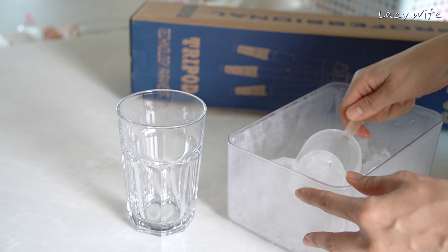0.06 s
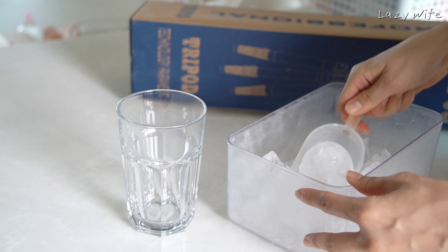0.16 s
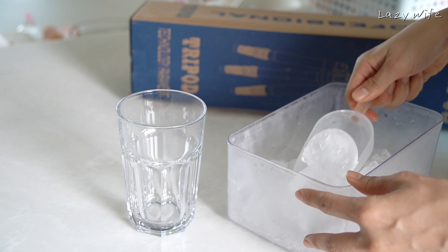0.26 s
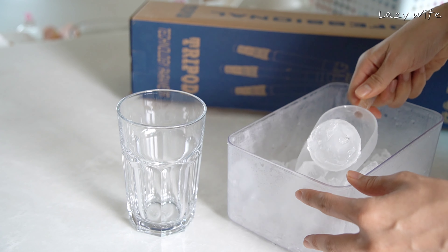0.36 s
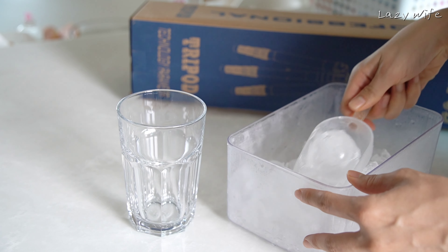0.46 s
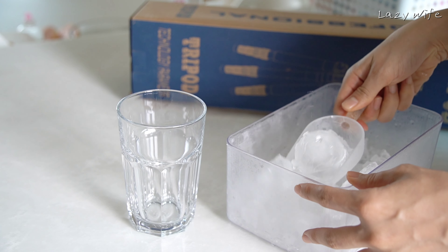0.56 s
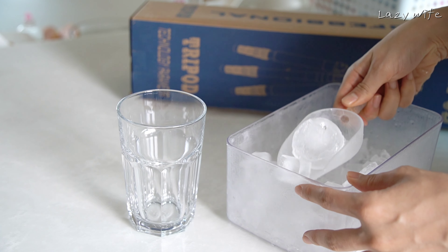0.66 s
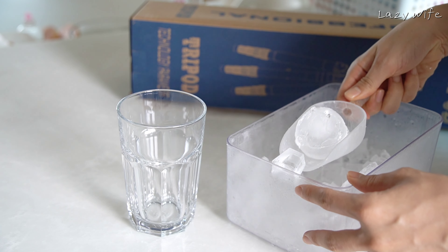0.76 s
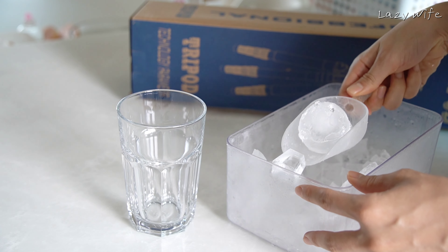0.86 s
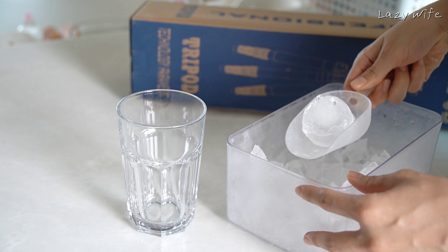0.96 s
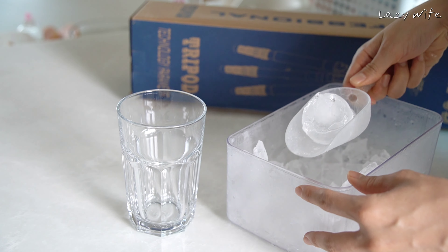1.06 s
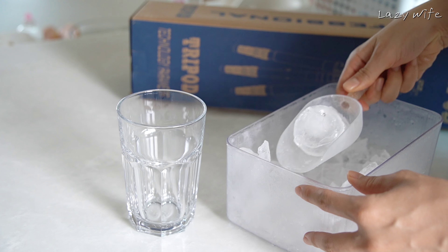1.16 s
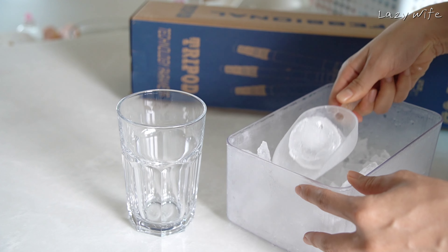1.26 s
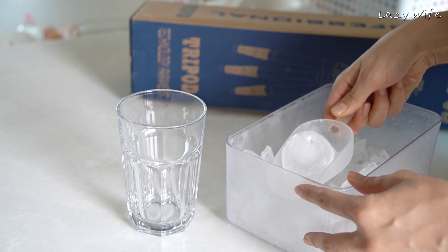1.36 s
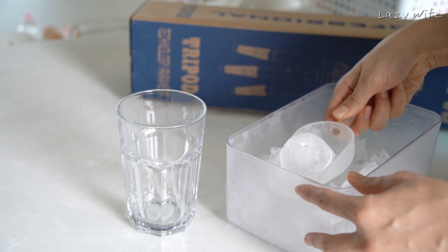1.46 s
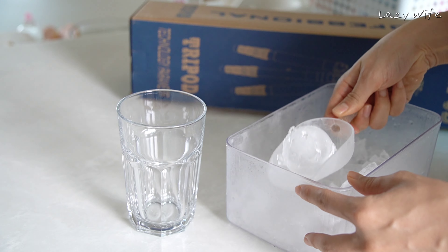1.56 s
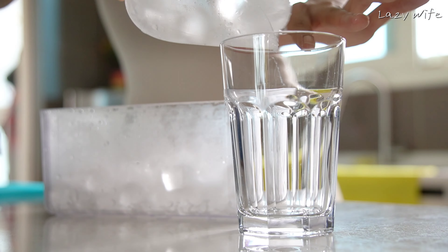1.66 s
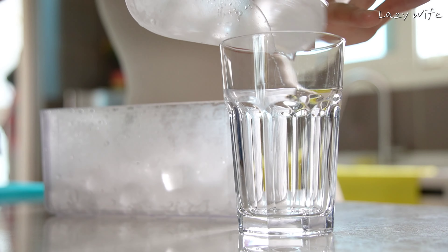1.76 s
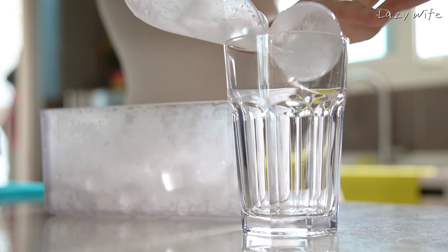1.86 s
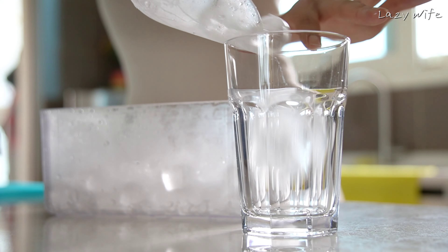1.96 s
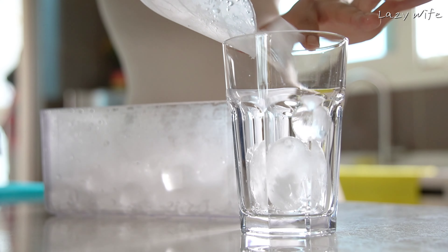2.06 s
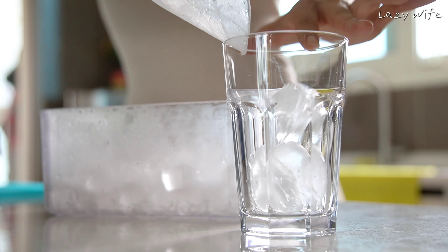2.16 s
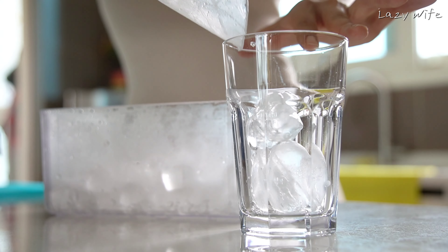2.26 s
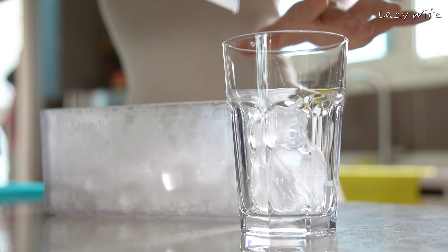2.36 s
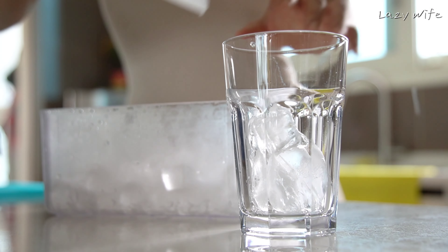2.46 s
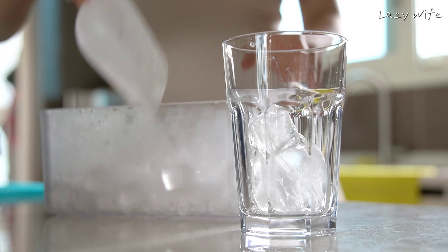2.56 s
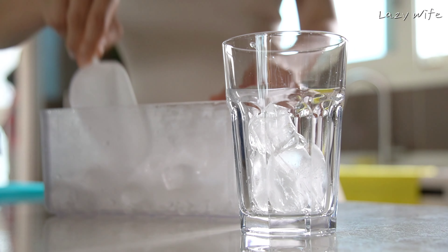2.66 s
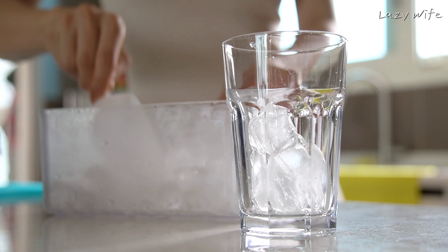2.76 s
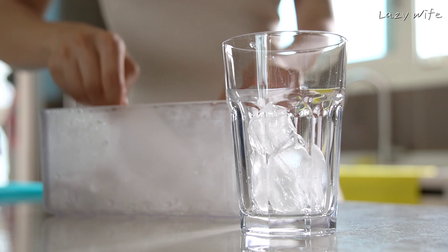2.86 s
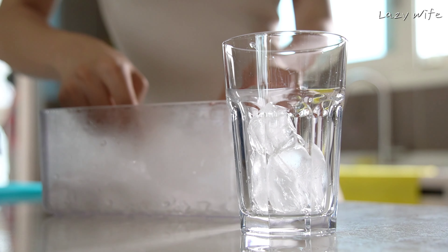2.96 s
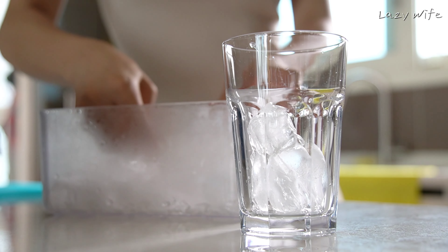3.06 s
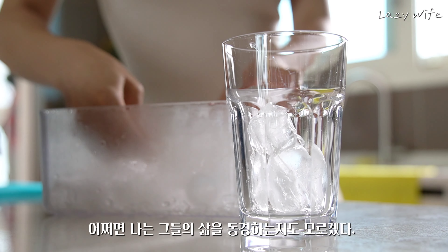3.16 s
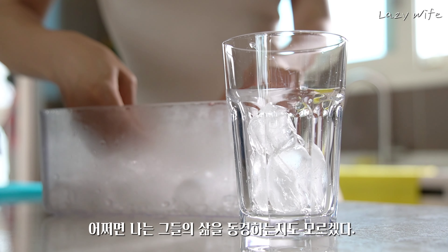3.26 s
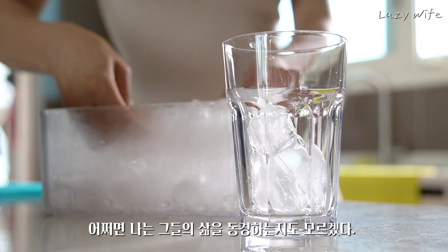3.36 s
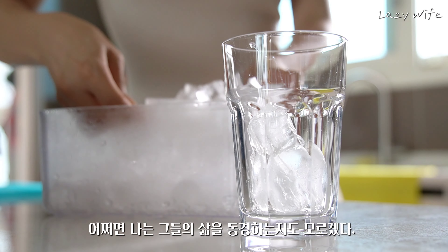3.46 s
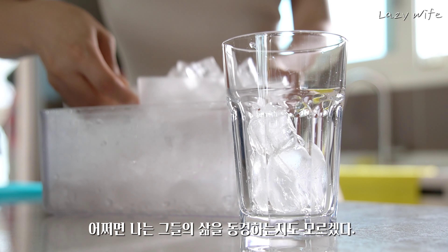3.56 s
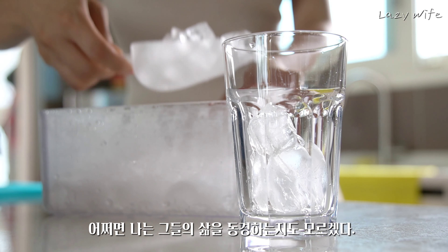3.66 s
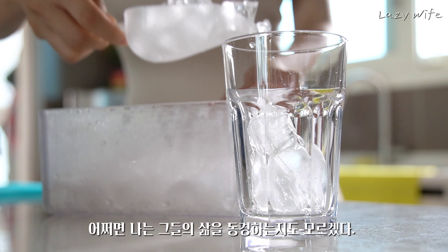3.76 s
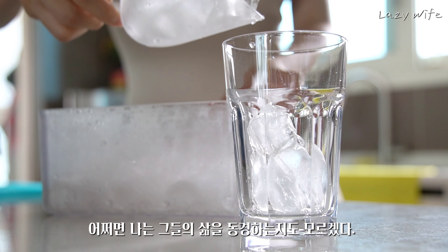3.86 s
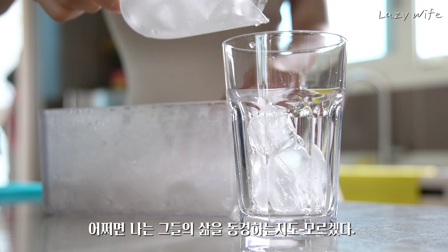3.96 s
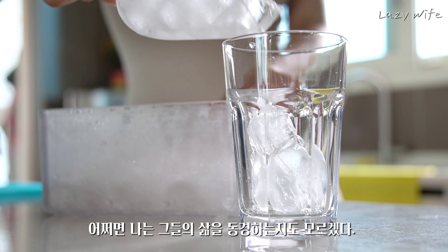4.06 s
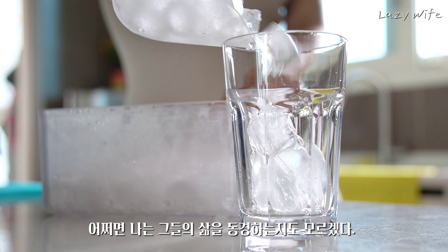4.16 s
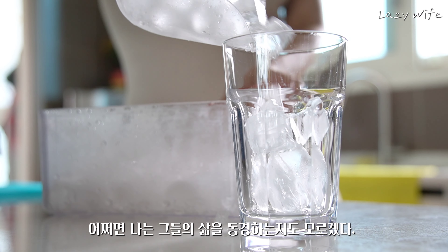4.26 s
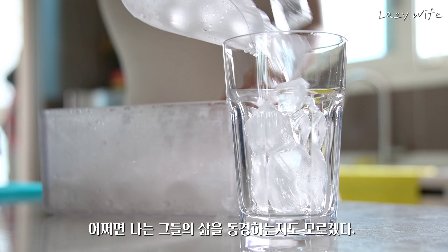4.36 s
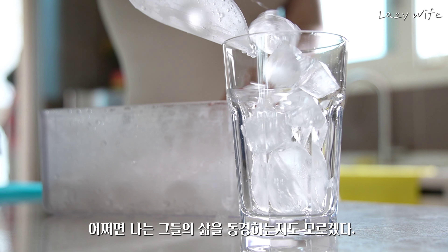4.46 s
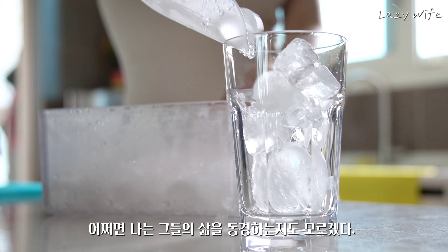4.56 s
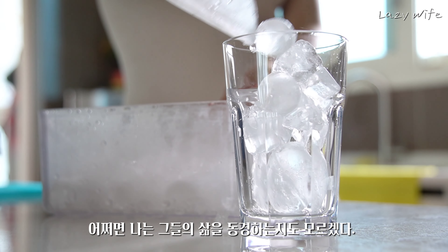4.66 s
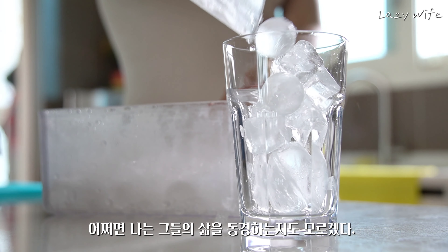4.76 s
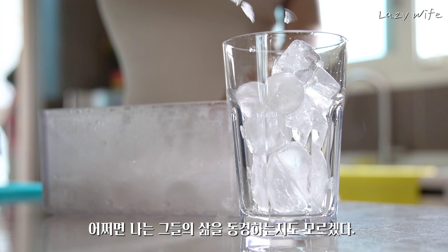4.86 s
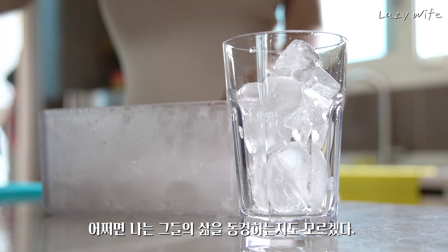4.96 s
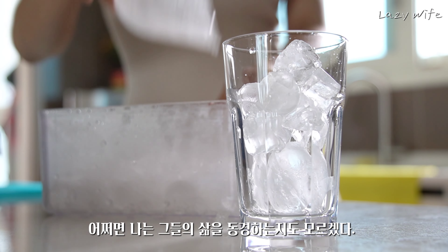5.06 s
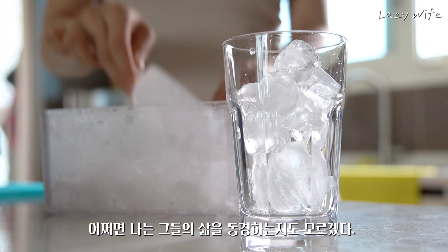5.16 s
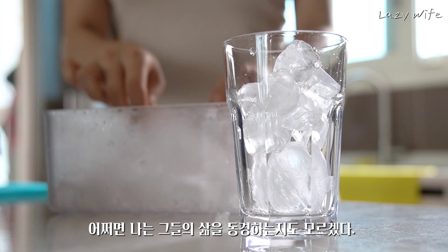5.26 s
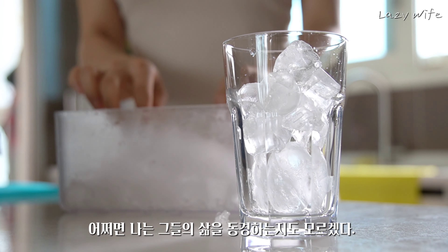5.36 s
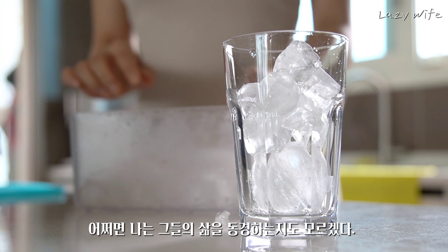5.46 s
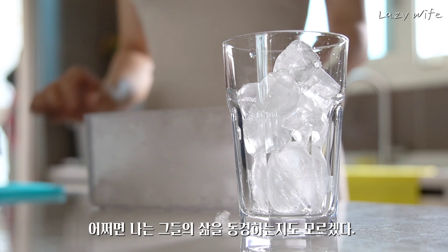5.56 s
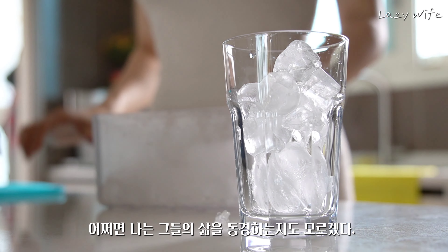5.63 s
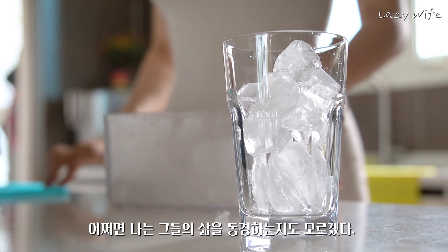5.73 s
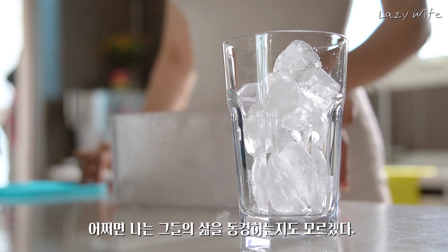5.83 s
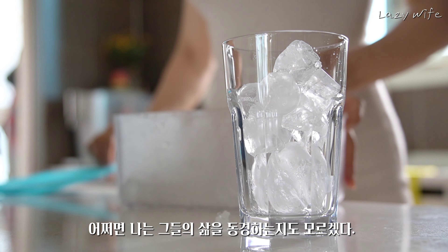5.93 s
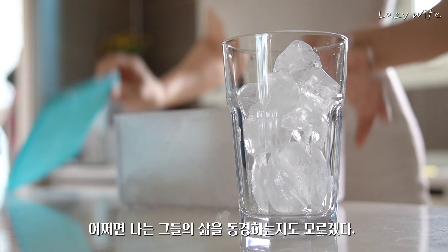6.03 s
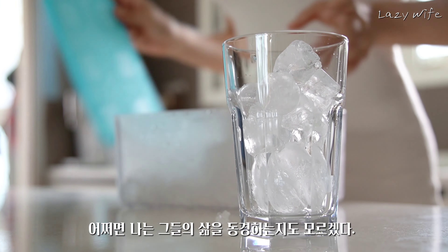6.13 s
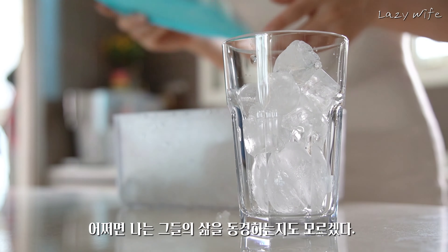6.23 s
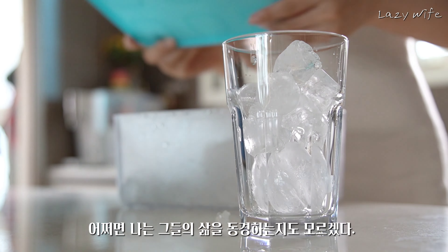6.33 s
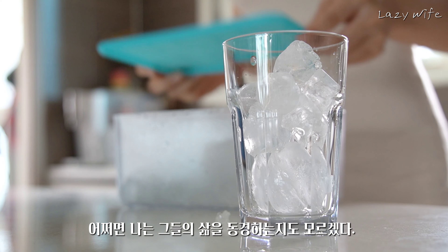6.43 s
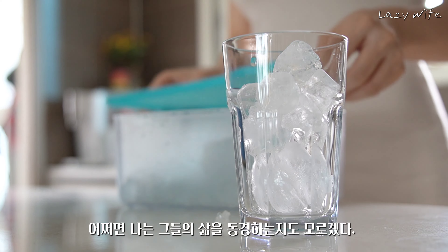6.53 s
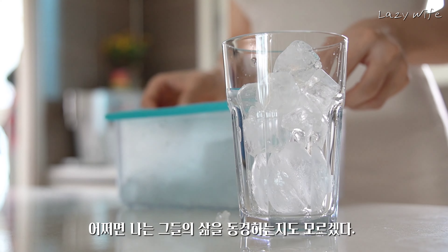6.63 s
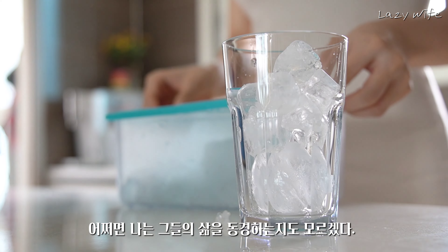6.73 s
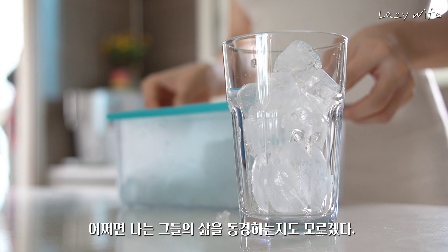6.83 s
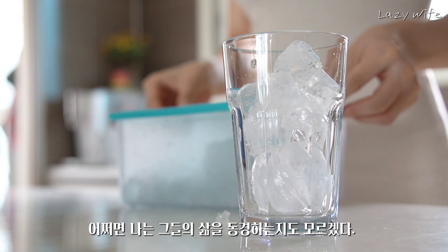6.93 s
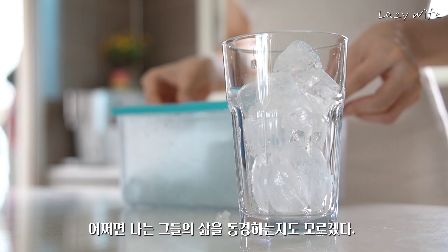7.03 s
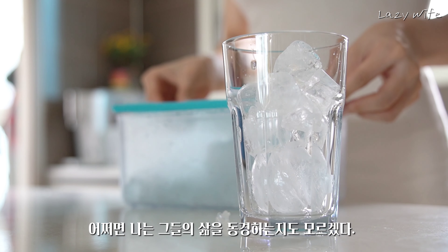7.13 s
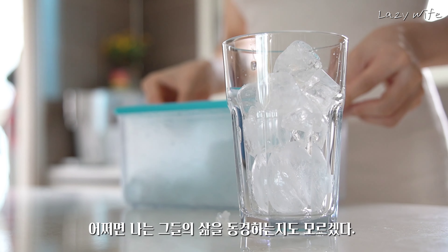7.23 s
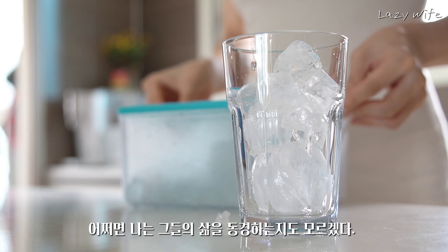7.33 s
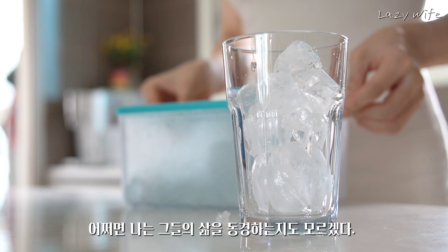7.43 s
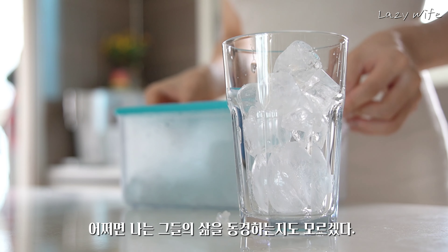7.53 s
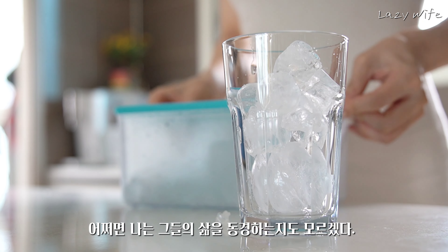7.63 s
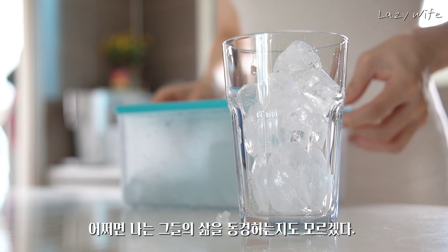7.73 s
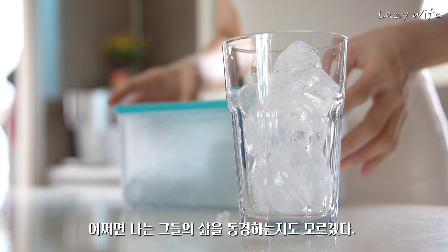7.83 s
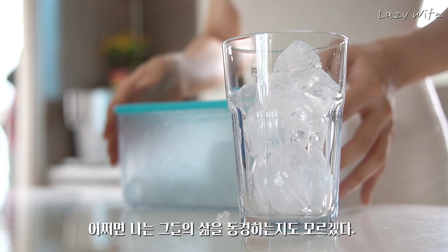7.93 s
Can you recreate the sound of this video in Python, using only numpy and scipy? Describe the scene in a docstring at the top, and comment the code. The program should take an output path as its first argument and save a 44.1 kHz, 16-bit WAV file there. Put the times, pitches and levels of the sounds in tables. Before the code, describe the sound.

Ice cubes rattle as a plastic scoop digs in a plastic tub, clink into a thick glass twice, then a soft lid thumps shut.

```python
"""Ice cubes churn and knock as a plastic scoop digs in a plastic tub and twice tips them into a thick glass.
Churn and knocks are short clacks of tub and cube modes; the glass rings in families of damped modes.
Single cubes ring out, landings thud, the scoop drops back, and a soft lid thumps and snaps as it is pressed on.
A small kitchen adds sparse echoes, a low rumble and a far hiss, both shaped noise."""
import sys
import numpy as np
from scipy import signal
from scipy.io import wavfile
from scipy.ndimage import uniform_filter1d

SR = 44100
rng = np.random.default_rng(int(sys.argv[2]) if len(sys.argv) > 2 else 0)


def boost_factor(decibels):
    """Convert a level in decibels to a linear amplitude factor."""
    exponent = np.asarray(decibels, float) / 20
    return 10 ** exponent


def int16_out(signal):
    """Quantize to a 16-bit WAV file."""
    q = np.round(np.clip(np.atleast_2d(signal).T, -1, 1) * 32767)
    wavfile.write(sys.argv[1], SR, q.astype(np.int16))


N = 352359


def evened(x):
    """Scales to rms 1."""
    return x / np.sqrt(np.mean(x ** 2) + 1e-20)


def read(points, hz):
    """Value of a table on a log-frequency axis."""
    f, value = np.transpose(points)
    return np.interp(np.log(hz + 1), np.log(f + 1), value)


def add(mix, s, sound):
    """Mixes a two-channel sound in at time s."""
    part = mix[:, round(s * SR):][:, :sound.shape[1]]
    part += sound[:, :part.shape[1]]


def ring(hz, db, t60, luck, length_s, apart_hz=9000):
    """Dying sines; the higher the mode, the more its phase may differ between left and right."""
    t = np.arange(round(length_s * SR)) / SR
    spread = (luck[1] - .5) * np.pi * np.minimum(hz / apart_hz, .9)
    phase = 2 * np.pi * luck[0] + np.outer([1, -1], spread)
    waves = np.sin(2 * np.pi * hz[:, None] * t + phase[..., None])
    fading = boost_factor(db[:, None] - 60 * t / t60[:, None])
    onset = np.minimum(t / 0.00023, 1)
    return (fading * waves).sum(1) * onset


# Left-right likeness of noise. Each row: frequency in Hz, likeness (1 = identical).
LIKENESS = [(60, 1), (950, 0.92), (15000, 0.046)]


def air(spectrum, patchy_db):
    """Steady noise of a given spectrum with faint drifting patches, alike left and right in the bass."""
    frames, hz = N // 256 + 5, np.fft.rfftfreq(1024, 1 / SR)
    a, b, c, d, patches = rng.standard_normal((frames, 513, 5)).T
    patches = uniform_filter1d(patches, size=10, axis=0)
    patches = evened(uniform_filter1d(patches, size=12, axis=1))
    same = np.clip(read(LIKENESS, hz), -1, 1)[:, None]
    left = a + 1j * b
    right = same * left + np.sqrt(1 - same ** 2) * (c + 1j * d)
    z = np.array([left, right]) * boost_factor(read(spectrum, hz)[:, None] + patchy_db * patches)
    return evened(signal.istft(z, nperseg=1024, noverlap=768)[1][:, :N])


# Ice tumbling inside the glass. Each row: start in seconds, end in seconds.
POURS = [(1.87, 2.7), (4.25, 5.2)]


def pouring(s):
    """True while ice tumbles inside the glass."""
    return sum((a < s) & (s < b) for a, b in POURS)


# Body modes. Each row: frequency in Hz, relative level in dB of the tub from above,
# of the tub from the side, of ice piling in the glass, t60 in seconds.
BODY_MODES = [(470, -12.5, -3.5, -0.5, 0.038), (664, -2.5, 7, -9.5, 0.028), (822, 1.5, -0.5, 3.5, 0.03),
              (1075, -0.5, 2, 0.5, 0.021), (1336, -4.5, -3.5, -1, 0.036), (1660, -9, -1.5, 0, 0.033),
              (2410, -2, -31, 10.5, 0.0097)]
# Strength of cube modes. Each row: frequency in Hz, relative level in dB.
CUBE_MODES = [(1500, 8), (3500, 1), (8000, -6.5), (16000, -13)]
MOVED_S = 1.76  # from here on the microphone stands beside the tub


def clacks(count):
    """Makes clacks: a dull part (tub or ice pile, struck at a new spot) and a bright part (cube modes)."""
    tub_hz, *bodies_db, tub_t60 = np.transpose(BODY_MODES)
    parts = []
    for luck in rng.random((count, 5, 36)):
        few = luck[:, :len(BODY_MODES)]
        spot_hz = tub_hz * (1 + .13 * (few[2] - .5))
        bodies = [ring(spot_hz, db + 9 * few[3], tub_t60, few, .05) for db in bodies_db]
        cube_hz = 1500 + 14500 * luck[2] ** 1.4
        cube_t60 = .007 + .024 * luck[4] ** 2
        cube = ring(cube_hz, read(CUBE_MODES, cube_hz) + 14 * luck[3], cube_t60, luck, .05)
        parts.append([part / abs(part).max() for part in bodies + [cube]])

    def pick(s, luck):
        """Draws a dull part for the body heard at time s, and a bright part."""
        body = int(s > MOVED_S) + int(pouring(s))
        return parts[int(luck[0] * count)][body], parts[int(luck[1] * count)][-1]

    return pick


# Surges of churning ice. Each row: peak time in seconds, collision level in dB,
# build-up in dB per second, dying away in dB per second.
SURGES = [(0, -20.5, 99, 35.5), (0.624, -24, 27, 55), (1.15, -34, 125, 70), (1.65, -36, 36, 136),
          (1.96, -28, 109, 52), (2.147, -23.5, 693, 75), (2.82, -26, 700, 19.5), (3.089, -23.5, 76, 75),
          (3.45, -37, 82, 42), (3.92, -33.5, 27, 53), (4.369, -29.5, 313, 17.5), (5.383, -25, 900, 91),
          (5.82, -34, 58, 256)]
SLIDES_PER_S = 60
CRACK_DB, FROST_DB = 4, -5  # bright cube part, and hiss of rubbing frosty faces, against the dull part
POUR_BRIGHT_DB = -5.5  # the glass wall shuts in the bright part


def churn(pick):
    """Cubes slip in small slides: each is a quick dying run of collisions, most faint, a few strong."""
    out, starts = np.zeros((2, N)), np.arange(0, 6, 1 / SLIDES_PER_S)
    s, top_db, build, dying = np.transpose(SURGES)[..., None]
    since = starts - s
    effort = boost_factor(2 * (top_db + np.where(since < 0, build, -dying) * since))  # power
    effort_db = 10 * np.log10(effort.sum(0) + 1e-12)
    shut_db = POUR_BRIGHT_DB * pouring(starts)
    frost_db = FROST_DB + np.interp(np.arange(N) / SR, starts, effort_db + shut_db, right=-120)
    out += boost_factor(frost_db) * air([(500, -25)] + CUBE_MODES, patchy_db=4.5)
    lucks = rng.random((len(starts), 14, 4))
    for start, level_db, crack_db, luck in zip(starts, effort_db, CRACK_DB + shut_db, lucks):
        slide_db = level_db + 9 * (luck[0, 2] - .5)
        for late, size, *which in luck:
            dull, bright = pick(start, which)
            late_s = luck[0, 3] / SLIDES_PER_S - .012 * np.log(late + .01)
            hit_db = slide_db - 3.3 * np.log(size + 0.035)
            add(out, start + late_s, boost_factor(hit_db) * (dull + boost_factor(crack_db) * bright))
    return out


# Noise spectra. Each row: frequency in Hz, relative level in dB per Hz.
RUMBLE = [(15, -31), (25, -4.5), (270, -6), (818, -13.5), (16000, -52.5)]
HISS = [(1180, -7), (2490, -9), (4490, -1.5), (13000, -20.5)]
# Slow swells. Each row: time in seconds, far hiss in dB, rumble in dB above its usual level.
SWELL = [(0, -110, -7.5), (1.75, -38.5, -2.5), (2.65, -64, -3.5), (5.3, -46, -0.5), (7.99, -42, 3)]
RUMBLE_DB = -39


def background():
    """House rumble and a broad far hiss, each swelling slowly."""
    s, hiss_db, rumble_db = np.transpose(SWELL)
    t = np.arange(N) / SR
    rumble = boost_factor(RUMBLE_DB + np.interp(t, s, rumble_db)) * air(RUMBLE, patchy_db=1.5)
    hiss = boost_factor(np.interp(t, s, hiss_db)) * air(HISS, patchy_db=1.4)
    return rumble + hiss


# Single knocks of ice and scoop. Each row: start in seconds, dull part in dB, bright part in dB.
KNOCKS = [(0.409, -16.5, -6.5), (0.687, -11, -15), (1.06, -19, -20), (1.109, -16.5, -8.5),
          (1.287, -17.5, -14), (1.472, -8.5, -10), (1.559, -25, -12.5), (1.643, -19, -9.5),
          (1.94, -10.5, -8.5), (2.234, -6.5, -16), (2.578, -22.5, -42), (2.799, -11.5, -13.5),
          (3.521, -12.5, -22), (3.581, -14, -16), (3.608, -8.5, -18), (3.7, -13.5, -12), (3.725, -8, -12),
          (3.879, -13, -18), (3.938, -12.5, -10), (4.287, -29, -11), (4.353, -11.5, -9.5),
          (4.522, -14.5, -11), (4.921, -30, -14), (5.01, -21, -13), (5.367, -6.5, -8), (5.401, -12.5, -13),
          (5.567, -7.5, -5), (5.718, -16, -14), (5.734, -4.5, -18), (5.779, -9, -17)]
BOUNCE_S, BOUNCE_DB = .006, -1.5  # mean spacing is .9 of BOUNCE_S


def knocks(pick):
    """Each knock is a clack and two quick weaker bounces."""
    out = np.zeros((2, N))
    for (s, dull_db, bright_db), luck in zip(KNOCKS, rng.random((len(KNOCKS), 3, 3))):
        for k, (late, *which) in enumerate(luck):
            dull, bright = pick(s, which)
            clack = boost_factor(dull_db) * dull + boost_factor(bright_db) * bright
            add(out, s + k * BOUNCE_S * (.4 + late), boost_factor(BOUNCE_DB * k) * clack)
    return out


# Cubes that ring out clearly. Each row: start in seconds, level in dB, pitch in Hz.
NOTES = [(1.772, -24, 1854), (2.139, -11.5, 1665), (2.16, -13, 1700), (2.2, -23, 1690), (2.255, -17, 1670),
         (4.09, -25, 14800), (4.645, -22, 1620), (4.922, -31, 1640)]
NOTE_T60_S = .1


def notes():
    """One cube rings: a close pair of modes that beat roughly as they die."""
    out = np.zeros((2, N))
    for (s, db, hz), luck in zip(NOTES, rng.random((len(NOTES), 2, 2))):
        pair_hz, pair_db = hz * np.array([1, 1.04]), db - np.array([0, 6])
        add(out, s, ring(pair_hz, pair_db, np.full(2, NOTE_T60_S), luck, NOTE_T60_S))
    return out


# Cubes striking the glass. Each row: start in seconds, lowest wall ring in dB, upper wall rings in dB,
# base rings in dB, seconds until ice damps the wall.
CLINKS = [(1.791, -26.5, -42, -50, 0.06), (1.887, -18, -33, -36, 0.013), (1.946, -15.5, -20.5, -36, 0.045),
          (2.065, -14.5, -29, -58, 0.033), (2.11, -14.5, -31, -34.5, 0.015), (2.205, -27, -48, -43, 0.046),
          (2.254, -10.5, -33, -29.5, 0.0066), (2.37, -14, -28.5, -34, 0.046),
          (2.502, -31.5, -66, -56, 0.12), (3.995, -40, -28, -60, .07), (4.371, -13.5, -23, -28, 0.023),
          (4.398, -14.5, -30, -49, 0.015), (4.48, -17.5, -24.5, -41, 0.0059),
          (4.557, -8, -19.5, -31, 0.015), (4.578, -16.5, -20, -32, 0.028),
          (4.645, -15.5, -26.5, -35.5, 0.064), (4.757, -10.5, -29, -50, 0.0064),
          (4.99, -11, -22, -46.5, 0.0026)]
# Glass modes in three families: lowest wall ring, upper wall rings, base rings.
# Each row: frequency in Hz, relative level in dB, undamped t60 in seconds.
GLASS_MODES = [
    [(2340, -9, .4), (2360, -1, .19)],
    [(4735, -2, .28), (7750, -7, .24), (11680, -13, .13)],
    [(6555, 5, .38), (9520, 0, .24), (12380, -4, .16), (14090, -11, .13), (15300, -10, .11)],
]
# Damping of each family in dB, per contact: leaning ice, then the next cube.
DAMP_DB = [-11, -2, -2]


def glass(pick):
    """Each blow rings the mode families by its own amounts; leaning ice, or the next cube, soon damps them."""
    hz, db, t60 = np.transpose(sum(GLASS_MODES, []))
    family = np.repeat(np.arange(len(GLASS_MODES)), [len(modes) for modes in GLASS_MODES])
    out, t = np.zeros((2, N)), np.arange(round(.4 * SR)) / SR
    waits = np.diff([row[0] for row in CLINKS], append=N / SR)
    for row, wait, luck in zip(CLINKS, waits, rng.random((len(CLINKS), 4, len(hz)))):
        blow_db = np.take(row[1:-1], family) + db + 4 * (luck[2] - .5)
        loaded_hz = hz * (1 + .006 * (luck[3] - .5))  # leaning ice detunes the wall a little
        crack = pick(row[0], luck[3])[1]  # the cube itself
        add(out, row[0], boost_factor(row[1] - 1.5) * crack)
        tremble = uniform_filter1d(rng.standard_normal((len(GLASS_MODES), len(t))), size=250)
        shiver = boost_factor(2.5 * evened(tremble))  # loose cubes tremble on the wall
        contacts = sum(np.clip((t - s) / .006, 0, 1) for s in (row[-1], wait))
        for k, damp_db in enumerate(DAMP_DB):
            own = family == k
            rings = ring(loaded_hz[own], blow_db[own], t60[own], luck[:, own], .4)
            add(out, row[0], boost_factor(damp_db * contacts) * shiver[k] * rings)
    return out


# Cubes landing on the bottom or on the pile. Each row: start in seconds, thud in dB.
LANDINGS = [(1.887, -29.5), (1.96, -24.5), (2.134, -26), (2.234, -29.5)]
# Glass knocked into the counter. Each row: frequency in Hz, relative level in dB, t60 in seconds.
THUD_MODES = [(120, 2.5, 0.065), (249.4, 8, 0.078), (358, 6, 0.073), (646, 12.5, 0.032)]


def thuds():
    """A landing cube knocks the glass into the counter, each time at a new spot."""
    hz, db, t60 = np.transpose(THUD_MODES)
    out = np.zeros((2, N))
    for (s, thud_db), luck in zip(LANDINGS, rng.random((len(LANDINGS), 4, len(THUD_MODES)))):
        spot_hz = hz * (1 + 0.24 * (luck[2] - .5))
        spot_db = thud_db + db + 6 * (luck[3] - .5)
        add(out, s, ring(spot_hz, spot_db, t60, luck, .15))
    return out


# Presses on the lid. Each row: start in seconds, thump in dB, pitch of the trapped air in Hz.
PRESSES = [(6.687, -7.5, 525), (6.732, -5.5, 475), (6.782, -10, 397), (6.969, -11.5, 440),
           (7.051, -11, 416), (7.179, -18, 450), (7.287, -13, 420), (7.312, -10, 485), (7.345, -6.5, 302),
           (7.42, -16, 337), (7.583, -17.5, 296), (7.625, -15.5, 314), (7.961, -21, 258)]
SNAP_DB, SNAP_GROWTH, SNAP_FADE_DB_PER_S = 4, 1.99, 1200  # harder presses snap louder
JUDDER_S, JUDDER_DB = .07, -6.5  # longest delay; level before a further fade with delay


def lid(pick):
    """Air shut in under the lid thumps, the sheet adds near tones and judders as it settles, the rim snaps."""
    out = np.zeros((2, N))
    for (s, thump_db, hz), luck in zip(PRESSES, rng.random((len(PRESSES), 6, 5))):
        snap_db = SNAP_DB + SNAP_GROWTH * thump_db
        for k, (late, detune, *spot) in enumerate(luck):
            after = k > 0
            tones = hz * np.array([1, .83]) * (1 + .2 * (detune - .5) * after)
            tone_luck = np.outer(spot[1:], spot[1:])
            thump = ring(tones, np.array([-2, -8]), np.full(2, .055), tone_luck, .1)
            thump *= np.minimum(np.arange(thump.shape[1]) / (.003 * SR), 1)  # a soft finger loads slowly
            dull, bright = pick(0, spot)
            late_s = JUDDER_S * late * after
            weaker_db = (JUDDER_DB - 200 * late_s) * after
            add(out, s + late_s, boost_factor(thump_db + weaker_db) * thump)
            fade_db = SNAP_FADE_DB_PER_S * np.arange(dull.shape[1]) / SR
            snap = boost_factor(snap_db + weaker_db - fade_db) * (dull + boost_factor(-8.5) * bright)
            add(out, s + late_s, snap)
    return out


# Echo decay. Each row: frequency in Hz, t60 in seconds.
KITCHEN = [(200, 0.55), (14000, 0.18)]


def kitchen(x):
    """Sparse echoes of random sign, one in every 20 samples, each band dying at its own speed."""
    taps = np.zeros((2, SR // 2))
    starts = np.arange(100, SR // 2 - 20, 20)
    at = starts + rng.integers(0, 20, (2, len(starts)))
    np.put_along_axis(taps, at, rng.choice([-1., 1.], at.shape), 1)
    hz, t, (mid, side) = signal.stft(taps, SR, nperseg=256)
    side = side * np.minimum(hz / 6000, 1)[:, None] ** 0.51  # long waves reach both sides alike
    fading = boost_factor(-60 * t / read(KITCHEN, hz)[:, None])
    tail = signal.istft(np.array([mid + side, mid - side]) * fading, SR, nperseg=256)[1]
    tail = tail / np.linalg.norm(tail[0])
    return signal.fftconvolve(x.mean(0)[None], tail, axes=1)[:, :N]


def scene():
    """Tub, glass and lid in the kitchen, over the background; the glass stands nearest and sounds driest."""
    pick = clacks(count=60)
    high_pass = signal.butter(2, 400 / SR, "high")  # 200 Hz: churn and knocks carry little bass
    ice = signal.lfilter(*high_pass, churn(pick) + knocks(pick))
    tub = ice + notes() + thuds() + lid(pick)
    clinks = glass(pick)
    direct = (tub + clinks) * boost_factor(np.array([[-.4], [.4]]))  # left and right in dB
    echoes = boost_factor(-4) * kitchen(tub + boost_factor(-4) * clinks)
    return direct + echoes + background()


def top_cut(x):
    """Nothing passes above the cut-off."""
    return signal.sosfilt(signal.butter(12, 16710, fs=SR, output="sos"), x)


def record(dry):
    """Band-limits the mix to 15.8 kHz."""
    edge = signal.firwin(255, 15800, window=("kaiser", 8), fs=SR)
    finished = signal.oaconvolve(dry, edge[None], "same")
    return top_cut(finished)


dry = scene()
out = record(dry)
int16_out(out)
```